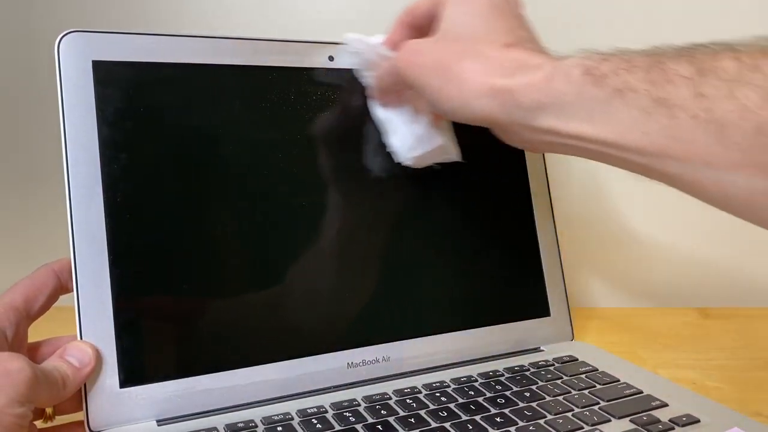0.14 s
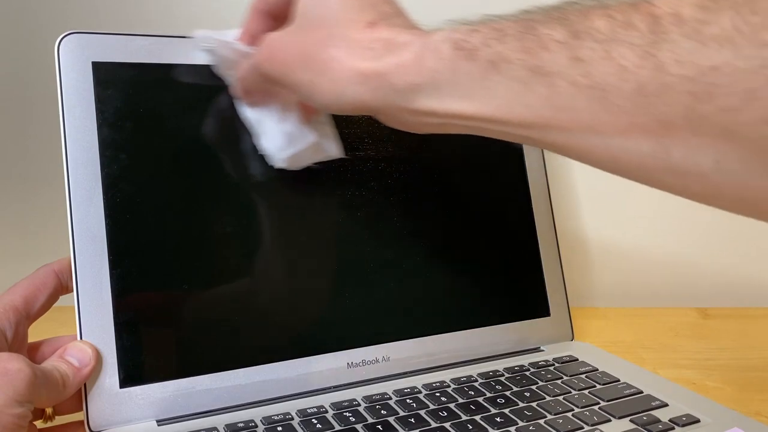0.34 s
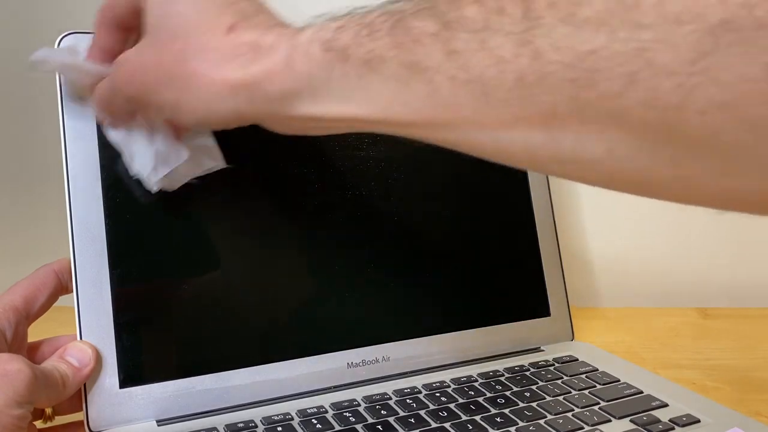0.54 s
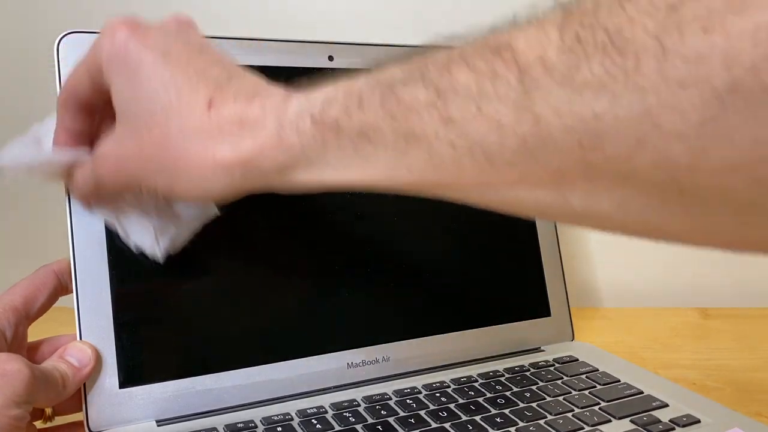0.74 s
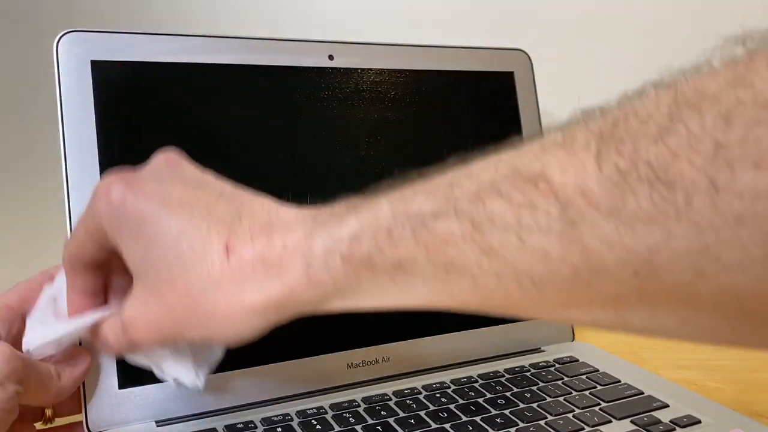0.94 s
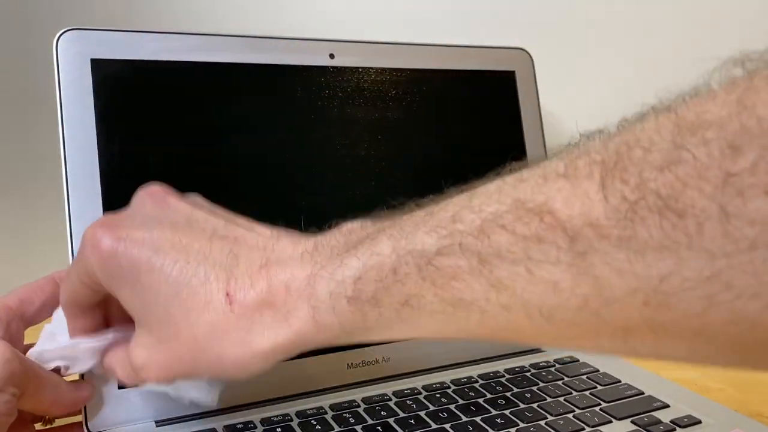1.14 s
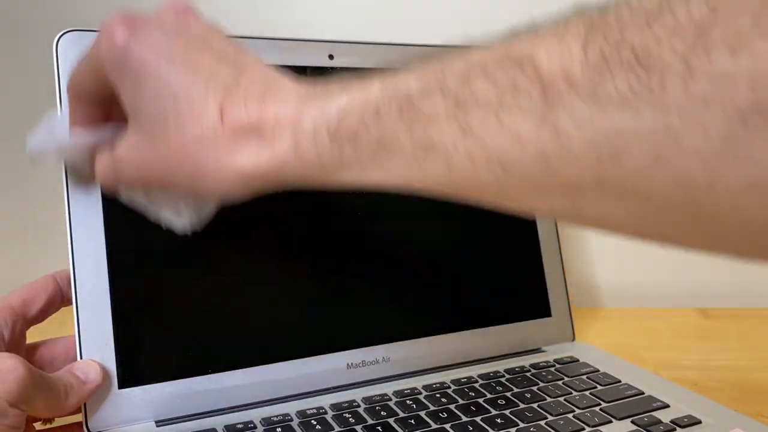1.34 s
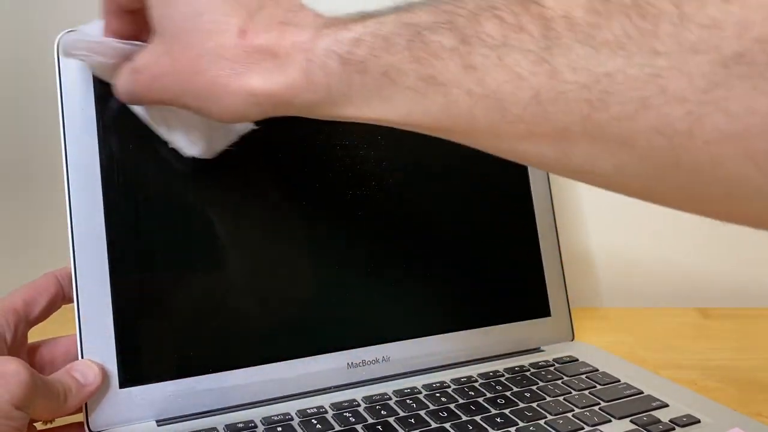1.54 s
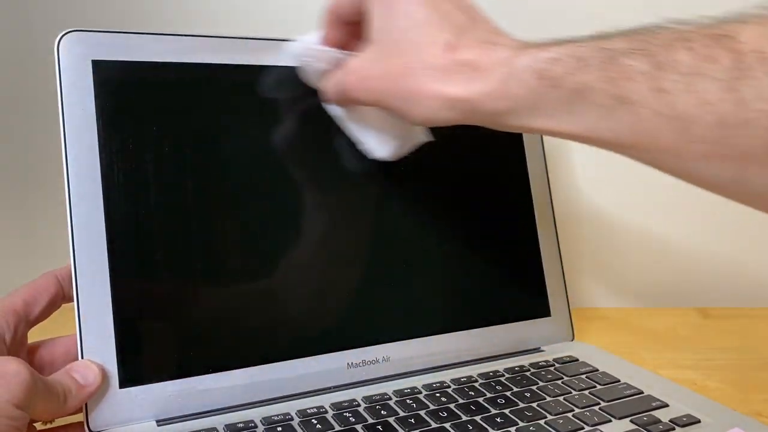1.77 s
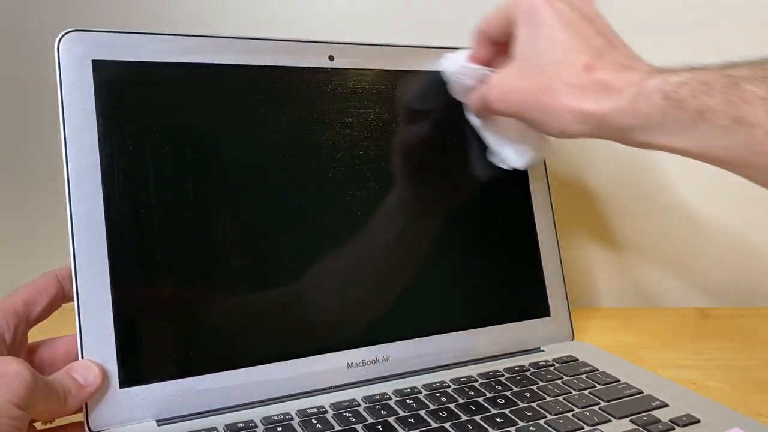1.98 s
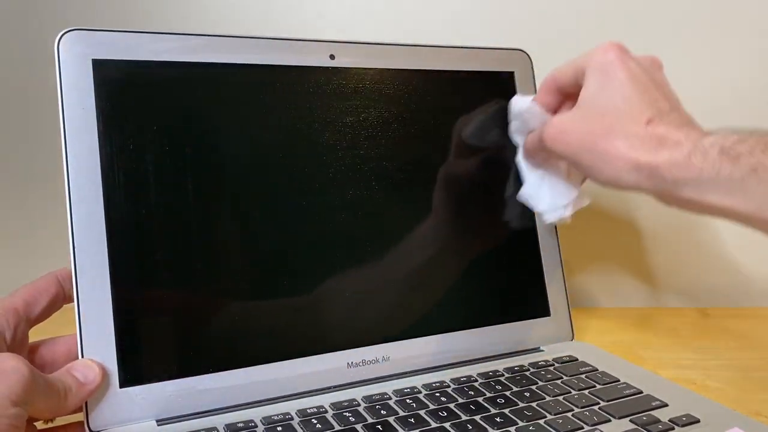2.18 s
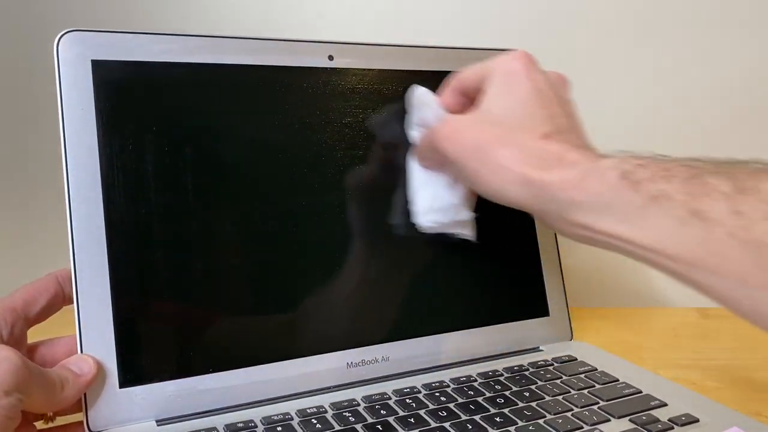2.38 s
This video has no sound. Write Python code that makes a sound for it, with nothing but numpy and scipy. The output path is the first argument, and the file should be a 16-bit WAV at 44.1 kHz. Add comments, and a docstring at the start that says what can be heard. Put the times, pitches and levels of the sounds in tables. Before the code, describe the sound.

A wet wipe rubs a laptop screen, heard close in a quiet room. A soft steady hiss runs 0-0.5 s, a fuller hollow swish 0.6-1.0 s, a brighter one 1.15-1.45 s, then fainter strokes at 1.6-1.9 and 2.05-2.25 s. Dull low lid thuds cluster near 0.6 s, with others around 0.37, 0.8, 1.0 and 2.1 s; a tiny fingertip tap at 0.8 s; faint low rumble throughout.

```python
"""Wet wipe on a laptop screen

Five strokes of a wet wipe over the glass, close to a two-port microphone in a quiet room.
The fibres hiss as dense random slips; the hollow under the hand colours them with a gliding resonance.
The hands bump the hinged lid, which thuds at a sagging pitch; a fingertip taps the bezel once.
Shaped noise makes the soft trembling of the lid and the low room rumble behind it."""
import sys
import numpy as np
from scipy import signal
from scipy.fft import rfft, irfft, next_fast_len
from scipy.io import wavfile
from scipy.ndimage import uniform_filter1d, map_coordinates

SR = 44100
rng = np.random.default_rng(int(sys.argv[2]) if len(sys.argv) > 2 else 0)


def pcm_store(signal):
    """Save signal as 16-bit PCM."""
    levels = np.round(np.clip(np.atleast_2d(signal), -1, 1) * 32767)
    wavfile.write(sys.argv[1], SR, levels.astype(np.int16).T)


N = 108045

# Rubbing strength, one list per stroke, each layer before its trim:
# (time [s], fibre hiss level [dB], hollow swish level [dB], low scrape level [dB])
STROKES = [
    [(0.0, -66.5, -66, -91), (0.1, -63, -60, -70), (0.22, -63, -65.5, -77.5), (0.36, -62.5, -64, -72),
     (0.44, -69, -74, -102), (0.56, -73, -70, -69)],
    [(0.57, -70.5, -69, -84), (0.605, -65.5, -58.5, -89), (0.71, -60.5, -56.5, -75.5),
     (0.81, -58.5, -55, -95), (0.87, -59.5, -55.5, -71), (0.94, -64.5, -67, -72.5), (1.0, -66, -63.5, -67),
     (1.04, -100, -84, -82)],
    [(1.11, -89, -88, -80), (1.17, -64.5, -69, -71), (1.22, -57.5, -67, -74.5), (1.3, -60, -77, -97),
     (1.43, -68, -74, -74), (1.48, -85.5, -83, -85)],
    [(1.58, -83, -81.5, -80), (1.64, -65.5, -76.5, -83), (1.71, -62.5, -70.5, -83),
     (1.77, -70.5, -75.5, -87), (1.84, -71, -74.5, -79), (1.96, -86, -86, -81)],
    [(1.99, -110, -81.5, -76), (2.08, -77, -65, -70.5), (2.122, -81.5, -67.5, -81), (2.14, -66, -75, -72),
     (2.2, -68.5, -69, -85), (2.25, -93, -89.5, -78), (2.34, -88.5, -82, -78), (2.45, -100, -86, -76.5)],
]
# Likeness of left and right for sounds away from the wipe: (frequency [Hz], likeness [0-1])
LOW_LIKENESS = [(60, 0.85), (300, 0.72), (700, 0.04), (3000, 0)]


def amp(db):
    """Decibels to gain."""
    return 10 ** (np.asarray(db) / 20)


def unit(x):
    """Scale to rms 1."""
    return x / np.sqrt(np.mean(x ** 2) + 1e-20)


def along(points, hz):
    """Read (position, value) points on a log axis."""
    position, value = np.transpose(points)
    return np.interp(np.log(hz + 1), np.log(position + 1), value)


def curves(rows, t, outside=None):
    """Each column after the time, read at the times t."""
    times, *columns = np.transpose(rows)
    return [np.interp(t, times, column, outside, outside) for column in columns]


def wobble(rate):
    """A smooth random curve, rate knots a second."""
    knots = rng.standard_normal(int(N * rate / SR) + 4)
    return map_coordinates(knots, [np.arange(N) * rate / SR])


def filtered(x, response):
    """x filtered by a complex response of frequency, padded so that the ends do not wrap."""
    size = next_fast_len(N + SR // 2)
    hz = np.fft.rfftfreq(size, 1 / SR)
    return irfft(rfft(x, size) * response(hz), size)[..., :N]


def paired(two, spectrum, likeness):
    """Colour two unrelated signals and mix them to a left and right of given likeness."""
    def mid_side_gains(hz):
        # the cosine of twice this angle is the likeness
        angle = np.arccos(np.clip(along(likeness, hz), 0, 1)) / 2
        return amp(along(spectrum, hz)) * [np.cos(angle), np.sin(angle)]

    mid, side = filtered(two, mid_side_gains)
    return np.array([mid + side, mid - side])


def wipe():
    """Each stroke swells a hiss, a hollow swish and a low scrape; the grip flutters slightly."""
    # Spectra of the three friction layers: (frequency [Hz], relative density [dB per Hz])
    hiss_spectrum = [(2500, -19.5), (4500, 0.5), (6300, -2), (7600, -1.5), (8700, 5), (10000, 1.5),
                     (11200, 1), (12300, 1.5), (14000, -4), (15800, -4)]
    swish_spectrum = [(700, 1.5), (1700, 0), (6000, -3), (15000, -5)]
    scrape_spectrum = [(250, -6), (600, 8), (950, 10), (1300, 0.5), (1850, 4.5), (2800, 2), (5000, -9)]
    # What a hollow of depth 1 does to a layer: (multiple of its resonance [ratio], gain [dB])
    hiss_shape = [(1, 0), (1.35, -4.5), (1.65, 0), (2, -.5), (2.35, 1.5), (2.9, 0)]
    swish_shape = [(.4, -18), (.6, -9), (.8, -4), (1, 0), (1.14, -1.5), (1.38, -11), (1.7, -11), (2.4, -22)]
    hiss_trim_db, swish_trim_db, scrape_trim_db = 3, 1, 0.5
    flutter_db, flutter_knots_per_s = .6, 70

    hiss_db, swish_db, scrape_db = curves(np.vstack(STROKES), np.arange(N) / SR, outside=-120)
    hiss = amp(hiss_db + hiss_trim_db) * friction(hiss_spectrum, hiss_shape)
    swish = amp(swish_db + swish_trim_db) * friction(swish_spectrum, swish_shape)
    scrape = amp(scrape_db + scrape_trim_db) * friction(scrape_spectrum)
    return (hiss + swish + scrape) * amp(flutter_db * wobble(flutter_knots_per_s))


def friction(spectrum, shape=((1, 0),)):
    """Dense fibre slips, coloured by the gliding hollow and picked up by both ports; rms 1 in the middle."""
    # The hollow under the travelling hand: (time [s], resonance [Hz],
    # depth [1 = cupped, 0 = open], corner above which the friction dulls [Hz])
    hollow_path = [(0.1, 3100, .8, 15500), (0.34, 2250, .4, 13500), (0.6, 3300, .7, 11500),
                   (0.7, 4100, 1.1, 12000), (0.85, 4800, 1.2, 13500), (0.93, 5400, .5, 15500),
                   (1.22, 5200, .8, 14500), (1.32, 4500, .8, 13500), (1.43, 3600, .5, 11000),
                   (1.7, 4900, .25, 15000), (2.06, 3850, .8, 12500), (2.19, 4600, .6, 15000)]
    # The wipe at the two ports: (frequency [Hz], phase lead of the left [rad])
    port_phase = [(500, 0), (1200, 1.4), (2000, .2), (3000, 1.5), (4300, .6), (5500, .5), (6800, -.5),
                  (7700, -1.6), (8100, -3.1), (11400, -6.8), (15600, -12.3)]
    # (frequency [Hz], left minus right [dB])
    port_balance = [(500, 1.5), (2000, -0.5), (3100, 8.5), (5000, 2), (7400, 3), (8400, 0)]
    # (frequency [Hz], likeness of left and right [0-1])
    port_likeness = [(2000, 0.41), (4500, 0.66), (7500, 0.74), (9000, 0.95)]
    slips_per_s, slip_share = 5000, 0.25  # the share is of power, the rest is smooth noise
    dull_db_per_octave, patchy_db = 24, 2.1

    slips = rng.standard_normal((2, N)) * (rng.random(N) < slips_per_s / SR)
    smooth = rng.standard_normal((2, N))
    source = np.sqrt(slip_share) * unit(slips) + np.sqrt(1 - slip_share) * smooth

    hz, t, frames = signal.stft(source, SR, nperseg=512)
    hz = hz[:, None]
    resonance, depth, corner = curves(hollow_path, t)
    hollow_db = depth * along(shape, hz / resonance)
    dull_db = dull_db_per_octave * np.log2(np.maximum(hz / corner, 1))
    # random patches of louder and softer rubbing, smoothed over frequency and time
    patches = rng.standard_normal(frames.shape[1:])
    patches = uniform_filter1d(patches, size=5, axis=0)
    patches = unit(uniform_filter1d(patches, size=8, axis=1))
    colour = amp(hollow_db - dull_db + patchy_db * patches)
    coloured = signal.istft(frames * colour, SR, nperseg=512)[1][:, :N]

    def ports(hz):
        half = np.array([[.5], [-.5]])  # left takes half of each difference, right the opposite
        return amp(half * along(port_balance, hz)) * np.exp(1j * half * along(port_phase, hz))

    pair = filtered(paired(coloured, spectrum, port_likeness), ports)
    return pair / pair.mean(axis=0).std()


def bumps():
    """A soft push sets the lid thudding at a sagging pitch, while the contact scuffs the casing."""
    # Pushes on the lid: (time [s], level [dB], settled pitch [Hz], extra starting pitch [share],
    # hold [s], scuff relative to the thud [dB], scuff length [s])
    pushes = [(0.19, -51.5, 61.5, 0.3, 0.038, -27, 0.03), (0.365, -42.5, 50.4, 2.6, 0.039, -20.5, 0.045),
              (0.556, -42, 80, 0.21, 0.031, -12, 0.04), (0.584, -39.5, 113.9, 0.83, 0.038, -17.5, 0.046),
              (0.61, -34.5, 77, 0.61, 0.044, -20, 0.031), (0.67, -47, 52, 0.14, 0.05, -19, 0.04),
              (0.812, -39, 70.4, 1.02, 0.047, -30, 0.023), (0.996, -39.5, 67.6, 0.5, 0.049, -33, 0.087),
              (1.27, -49, 56, 0.59, 0.025, -13, 0.038), (1.434, -51.5, 67.4, 0.44, 0.066, -13.5, 0.056),
              (2.066, -50, 81.4, 0.37, 0.033, -5.5, 0.062),
              (2.099, -45.5, 114.7, 0.33, 0.029, -16.5, 0.067),
              (2.13, -44.5, 55.3, 0.66, 0.039, -15.5, 0.075)]
    # Colour of a scuff on the casing: (frequency [Hz], relative density [dB per Hz])
    casing_spectrum = [(60, -20), (140, 14.5), (370, 0), (520, -6.5), (750, -5), (1300, -23.5), (4000, -37)]
    attack_s, t60_s = 0.012, 0.063
    relax_s = 0.013  # the pressed lid starts higher and sags to its settled pitch
    flex_hz, flex_db = 129.7, -13.5  # second bending mode of the lid

    thuds, contact = np.zeros(N + SR), np.zeros(N + SR)
    t = np.arange(SR // 3) / SR
    for start_s, db, hz, stiffen, hold_s, scuff_db, scuff_s in pushes:
        here = slice(round(start_s * SR), round(start_s * SR) + len(t))
        cycles = hz * (t + stiffen * relax_s * (1 - np.exp(-t / relax_s)))
        swell = np.sin(np.pi / 2 * np.minimum(t / attack_s, 1)) ** 2
        release = amp(-60 * np.maximum(t - hold_s, 0) / t60_s)
        ring = np.sin(2 * np.pi * cycles) + amp(flex_db) * np.sin(2 * np.pi * flex_hz * t)
        thuds[here] += amp(db) * swell * release * ring
        contact[here] += amp(db + scuff_db) * np.sin(np.pi * np.minimum(t / scuff_s, 1))
    scrub = unit(paired(rng.standard_normal((2, N)), casing_spectrum, LOW_LIKENESS))
    return thuds[:N] + contact[:N] * scrub


def tick():
    """A fingertip tap on the bezel rings a few decaying modes for a moment."""
    # Modes of the bezel: (frequency [Hz], relative level [dB], decay time t60 [s])
    bezel_modes = [(370, 2.5, 0.042), (720, -1, 0.018), (1020, 0.5, 0.019)]
    start_s, level_db, attack_s = .8075, -50.5, 0.002

    t = np.maximum(np.arange(N) / SR - start_s, 0)
    ring = np.zeros(N)
    for hz, db, t60 in bezel_modes:
        ring += amp(db - 60 * t / t60) * np.sin(2 * np.pi * hz * t)
    return amp(level_db) * ring * (1 - np.exp(-t / attack_s))


def tremble():
    """The dragging wipe keeps the lid shaking on its hinge, the more the harder it rubs."""
    # Colour of the shaking lid: (frequency [Hz], relative density [dB per Hz])
    lid_spectrum = [(20, -35), (40, 2), (62, 8.5), (105, -10.5), (150, -5.5), (400, -42.5), (1000, -89)]
    hardest_db, db_per_hiss_db = -59.5, 0.16  # level at the hardest rub, and how it follows the hiss

    hiss_db, _, _ = curves(np.vstack(STROKES), np.arange(N) / SR)
    level_db = hardest_db + db_per_hiss_db * (hiss_db - hiss_db.max())
    shaking = filtered(rng.standard_normal(N), lambda hz: amp(along(lid_spectrum, hz)))
    return amp(level_db) * unit(shaking)


def room():
    """Steady low rumble and faint hiss, as noise shaped by a fixed spectrum."""
    # Colour of the quiet room: (frequency [Hz], relative density [dB per Hz])
    room_spectrum = [(20, -25), (40, -4), (62, 0), (100, -4), (240, -15), (370, -15), (600, -24),
                     (2100, -38), (4800, -35.5), (7500, -44.5), (11500, -45), (15500, -99)]
    level_db = -60
    return amp(level_db) * unit(paired(rng.standard_normal((2, N)), room_spectrum, LOW_LIKENESS))


def scene():
    """The wipe close by, the lid a little to the right, and the room."""
    # Placing of the lid, a row each for left and right: (gain [dB])
    lid_pan_db = [
        [-.7],
        [.7],
    ]
    lid = bumps() + tick() + tremble()
    return wipe() + lid * amp(lid_pan_db) + room()


def record(dry):
    """Nothing is kept above the band limit."""
    top_hz = 15800
    return filtered(dry, lambda hz: hz < top_hz)


dry = scene()
out = record(dry)
pcm_store(out)
```